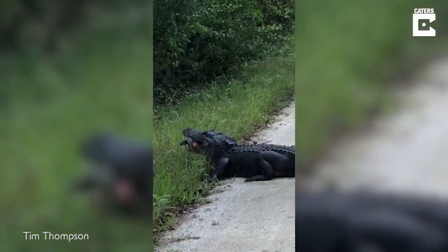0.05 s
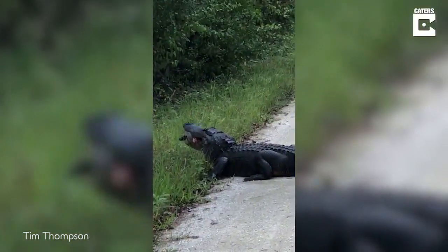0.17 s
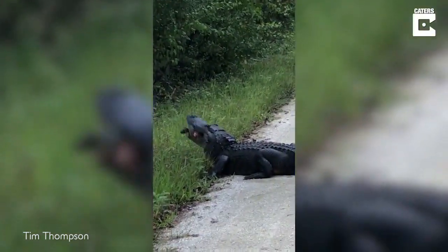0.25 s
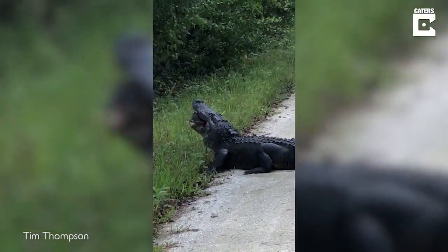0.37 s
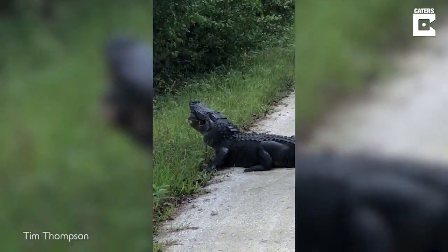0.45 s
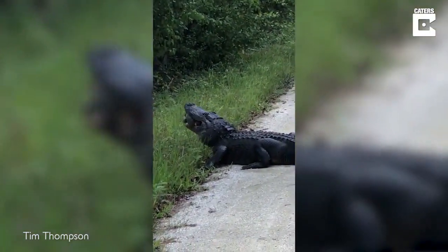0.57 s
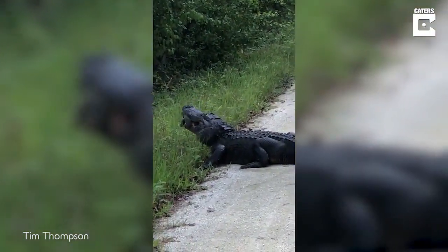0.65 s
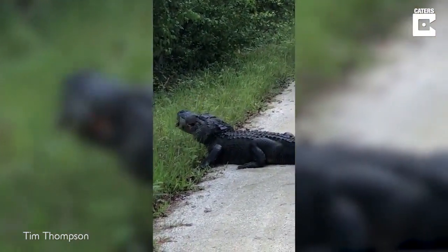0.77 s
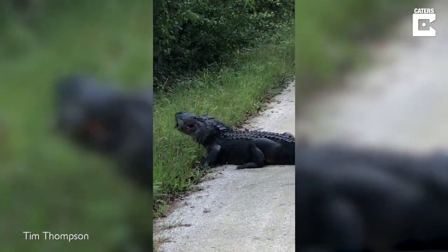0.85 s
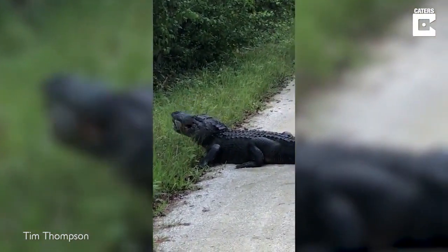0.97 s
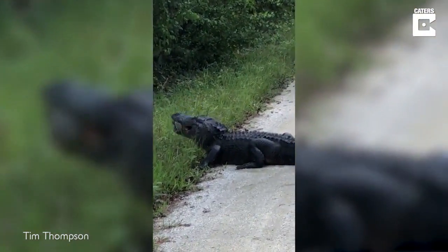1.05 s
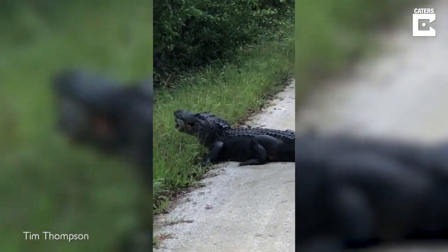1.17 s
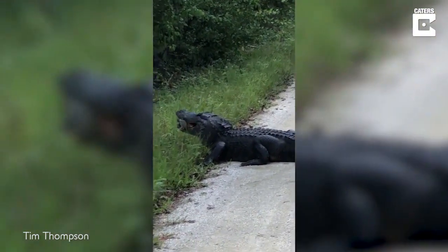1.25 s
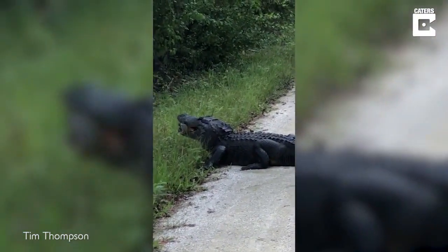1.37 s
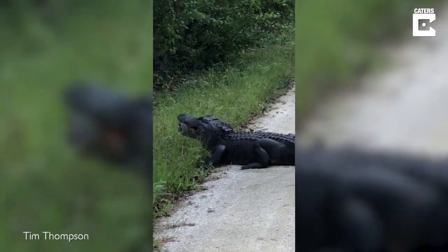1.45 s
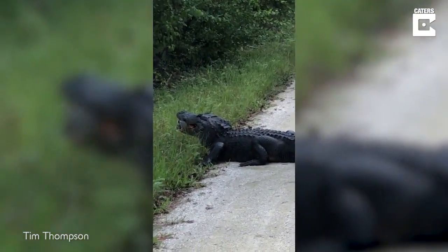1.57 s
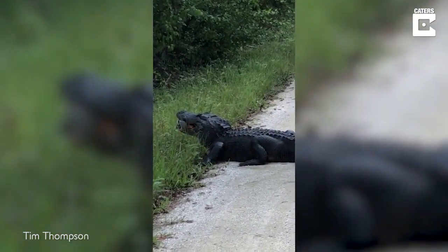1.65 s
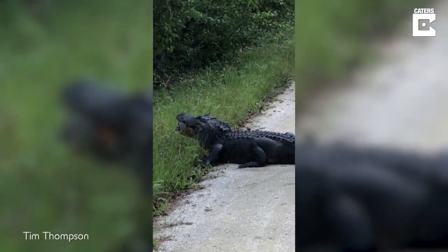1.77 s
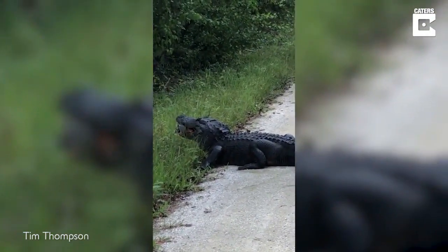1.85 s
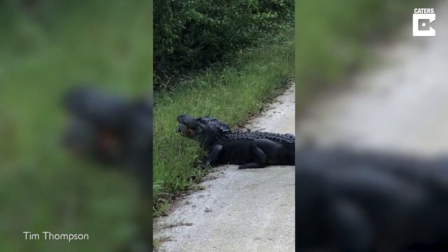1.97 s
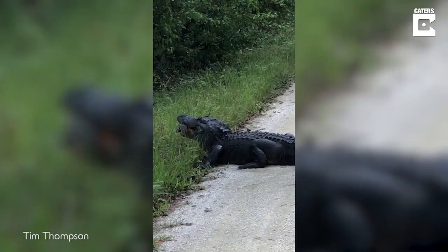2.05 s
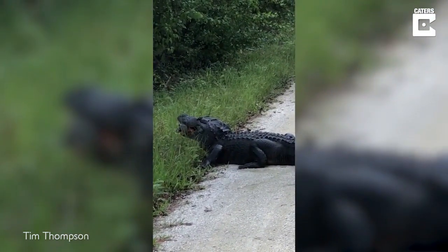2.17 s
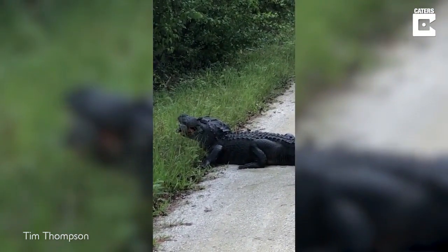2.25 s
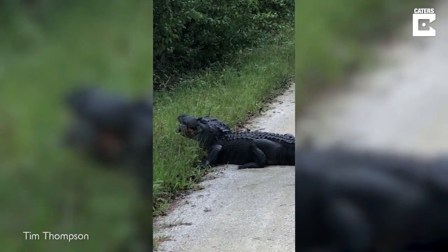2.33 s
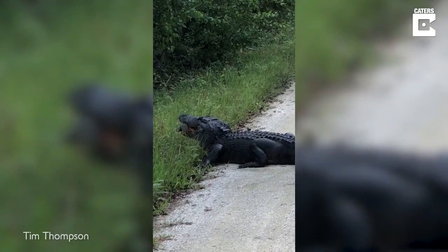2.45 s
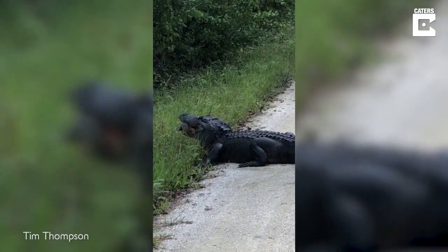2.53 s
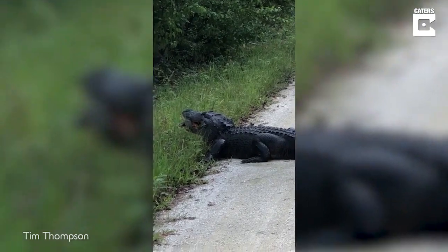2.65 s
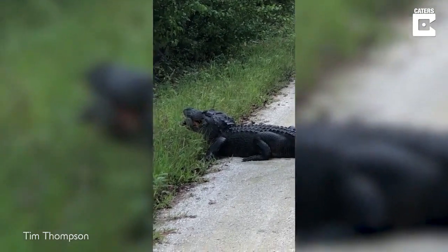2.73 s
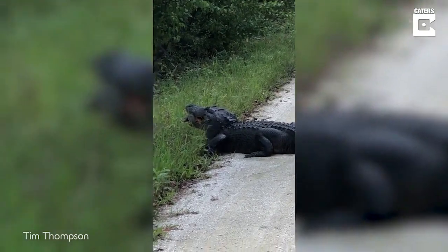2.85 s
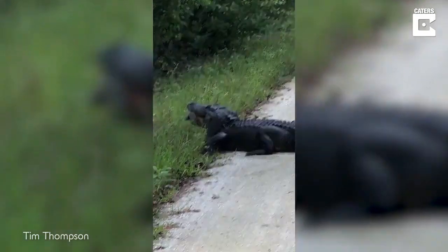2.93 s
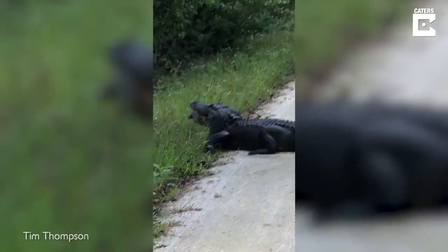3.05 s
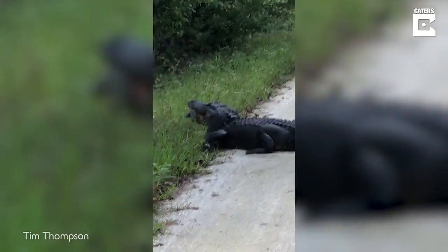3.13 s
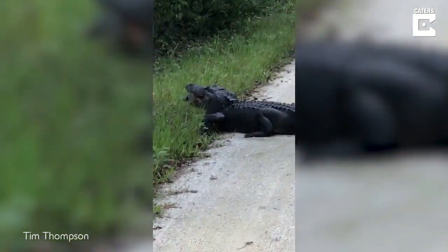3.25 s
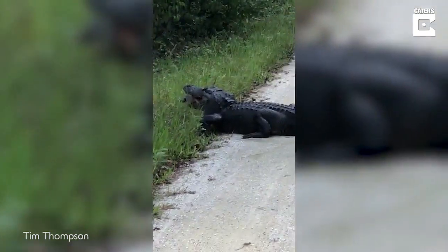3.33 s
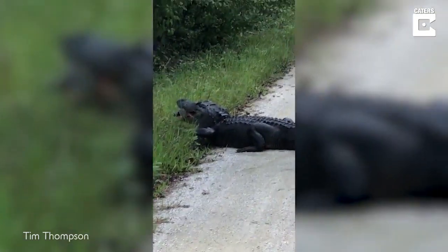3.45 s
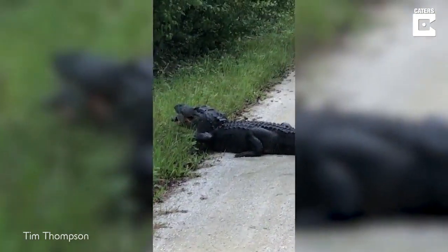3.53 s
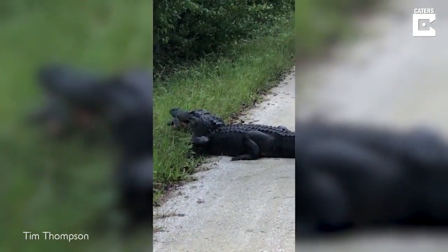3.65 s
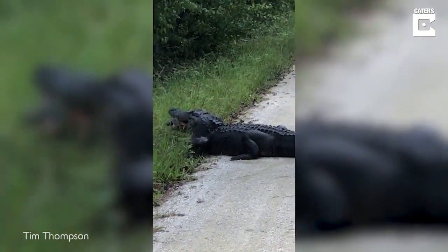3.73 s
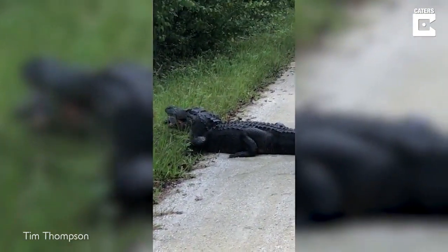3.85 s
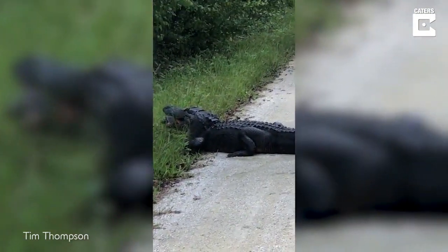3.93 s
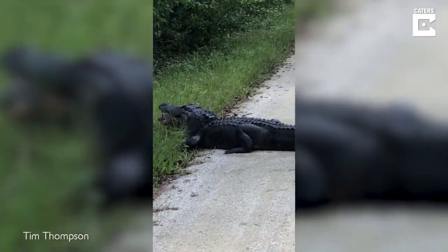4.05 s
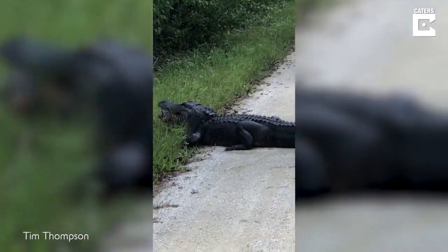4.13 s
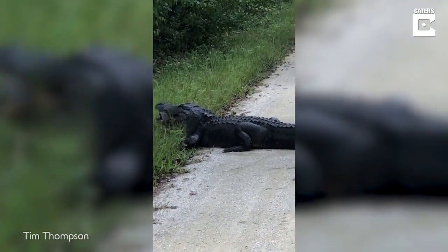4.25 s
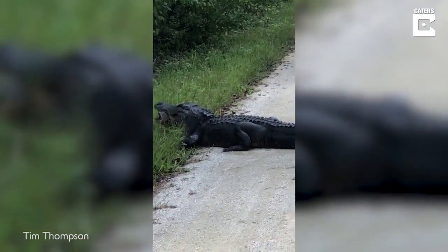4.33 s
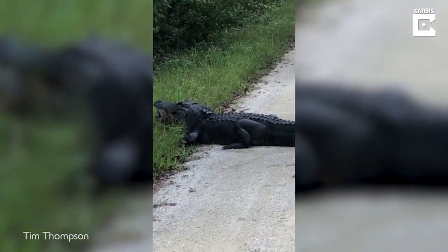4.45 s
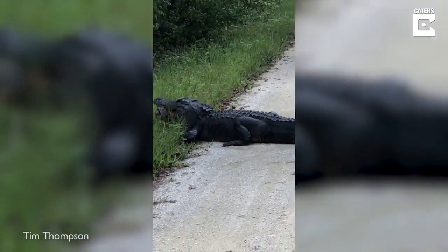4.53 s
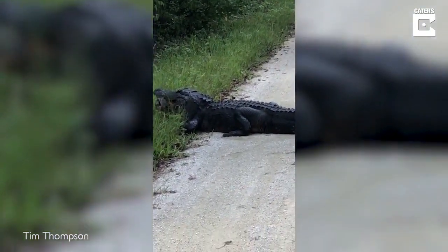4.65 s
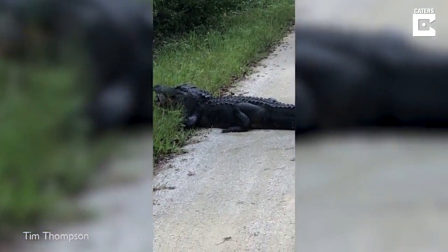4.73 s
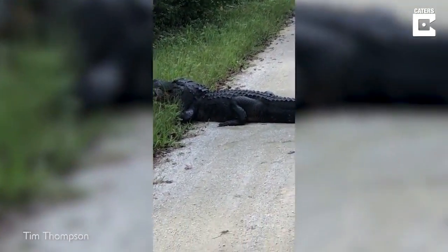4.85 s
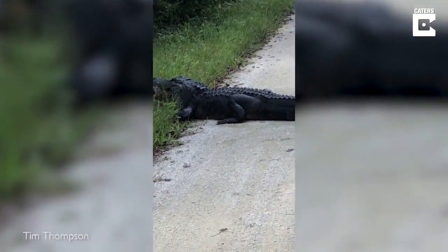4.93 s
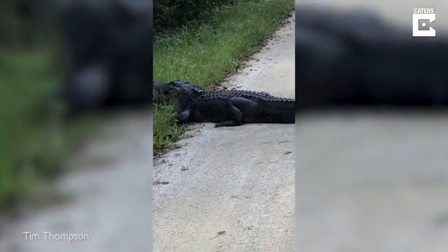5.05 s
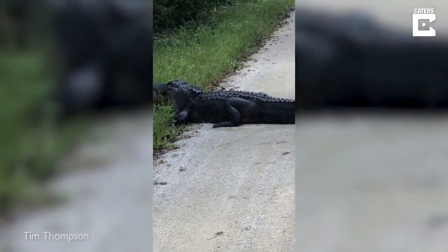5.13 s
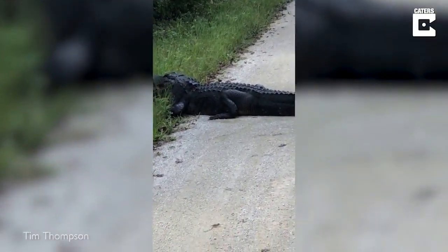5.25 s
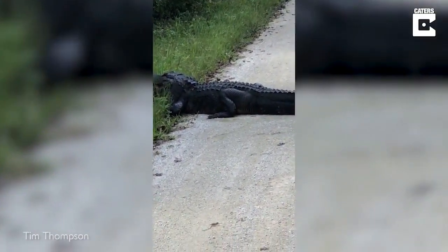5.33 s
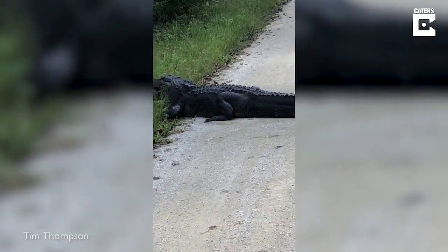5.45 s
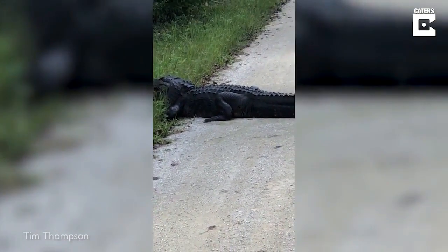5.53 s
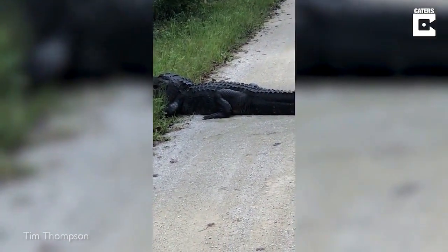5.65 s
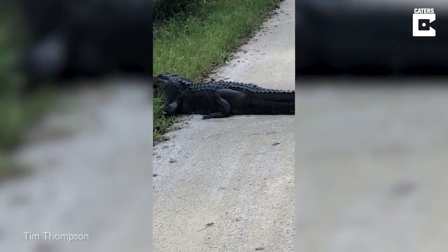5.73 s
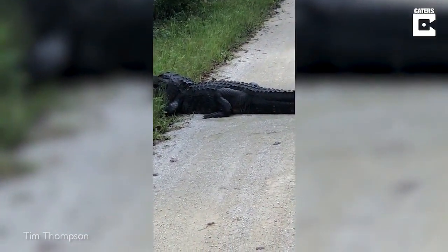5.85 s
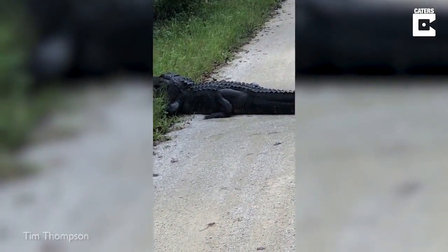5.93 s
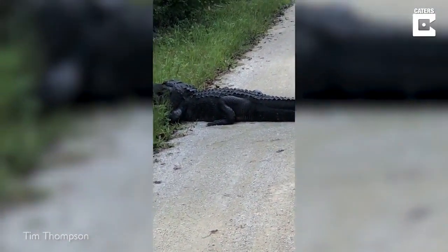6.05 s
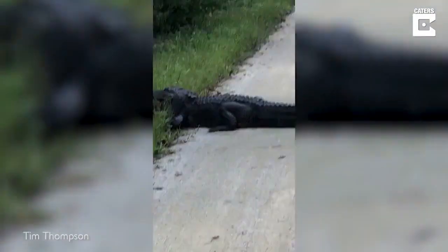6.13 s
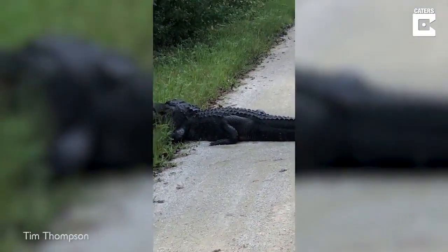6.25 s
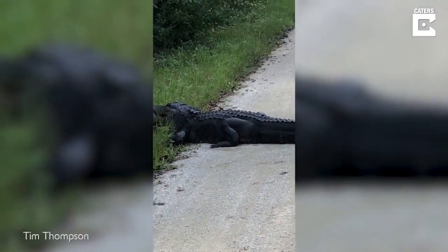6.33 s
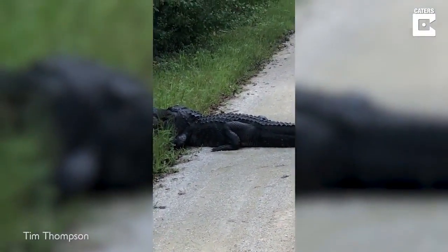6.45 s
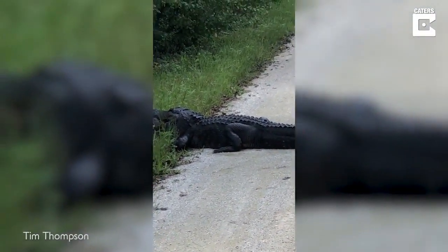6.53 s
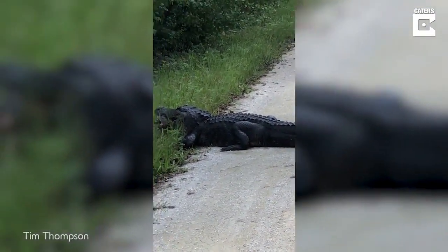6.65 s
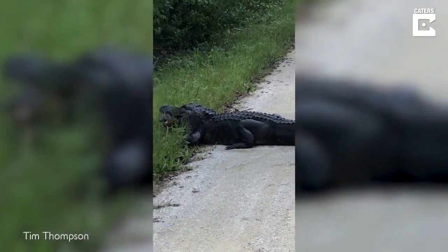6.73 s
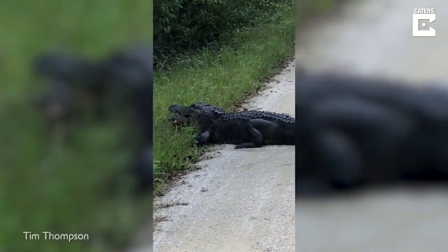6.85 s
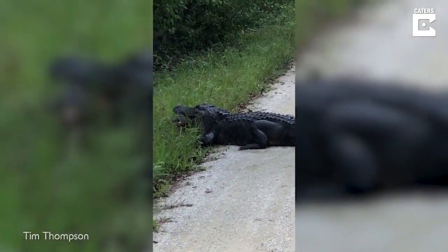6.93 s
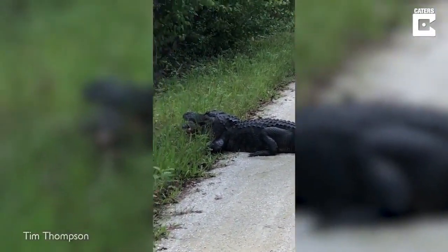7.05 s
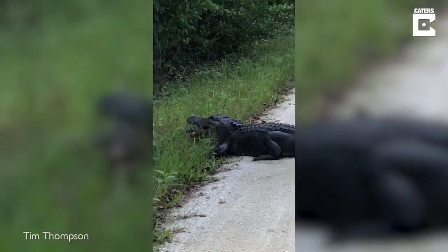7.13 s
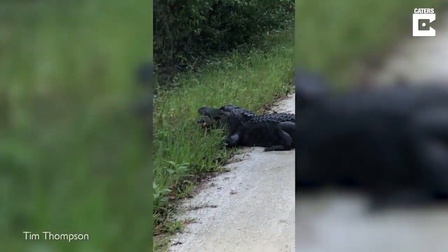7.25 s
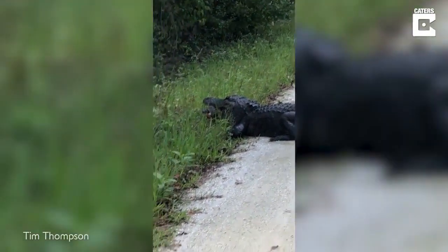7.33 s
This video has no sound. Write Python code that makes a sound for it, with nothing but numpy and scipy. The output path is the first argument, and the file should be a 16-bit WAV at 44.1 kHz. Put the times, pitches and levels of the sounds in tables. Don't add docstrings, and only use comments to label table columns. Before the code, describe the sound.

A hard shell splits and snaps in powerful jaws, ending in a hollow crush that echoes briefly, while an engine idles steadily nearby.

```python
import sys
import numpy as np
from scipy import signal
from scipy.fft import rfft, irfft, next_fast_len
from scipy.io import wavfile

SR = 44100
rng = np.random.default_rng(int(sys.argv[2]) if len(sys.argv) > 2 else 0)


def inscribe(sig):
    pcm = np.round(np.clip(np.atleast_2d(sig).T, -1, 1) * 32767)
    wavfile.write(sys.argv[1], SR, pcm.astype(np.int16))


def nominal_scale(level):
    x = np.asarray(level, float) / 20
    return 10 ** x


N = 325899


def rms_one(x):
    return x / np.sqrt(np.mean(x ** 2) + 1e-20)


def at_hz(points, hz):
    table_hz, values = np.array(points).T
    return np.interp(np.log(hz), np.log(table_hz), values)


def colour(x, spectrum):
    size = next_fast_len(len(x))
    hz = np.arange(size // 2 + 1) * SR / size + 1
    shaped = irfft(rfft(x, size) * nominal_scale(at_hz(spectrum, hz)), size)
    return rms_one(shaped[:len(x)])


def drift(rate_hz):
    r = np.exp(-80 * np.pi * rate_hz / SR)
    noise = rng.standard_normal(N // 40 + 2002)
    slow = signal.lfilter([1], [1, -2 * r, r * r], noise)[2000:]
    return np.interp(np.arange(N) / 40, np.arange(len(slow)), rms_one(slow))


def ring(x, hz, t60_s):
    r = nominal_scale(-60 / (t60_s * SR))
    w = 2 * np.pi * hz / SR
    return signal.lfilter([0, np.sin(w)], [1, -2 * r * np.cos(w), r * r], x + 1e-18)


def butter(x, hz, kind):
    return signal.lfilter(*signal.butter(2, hz, kind, fs=SR), x)


def grains(per_s, spread_db):
    sizes = nominal_scale(spread_db * np.minimum(rng.exponential(1, N), 4)) * rng.choice([-1, 1], N)
    return sizes * (rng.random(N) < per_s / SR)


def stroke(start_s, hold_s, db, attack_s, release_db_per_s):
    t = np.arange(N) / SR - start_s
    rise = np.clip(1 + t / attack_s, 0, 1) ** 2
    return rise * nominal_scale(db - release_db_per_s * np.clip(t - hold_s, 0, 1))


def bump(s, half_s):
    return np.exp(-((np.arange(N) / SR - s) / half_s) ** 2)


# time in seconds, peak in dB, ring in Hz, fracture length in ms.
SPLITS = [(0.5227, -50, 3480, .5), (.5448, -60, 6960, 0.37), (.5542, -75, 5530, .8),
          (.6000, -53, 6160, 1.1), (0.688, -47.5, 6600, 2.9), (.7795, -52, 3400, 1.4),
          (0.839, -26, 5800, 1.2), (0.8494, -30, 3800, 1.1), (0.8565, -9, 3550, 0.47),
          (.8580, -22.5, 1490, 1.5), (0.866, -30, 2440, 2.8), (0.8744, -14.5, 3380, 2.2),
          (0.8776, -53, 2040, 6.8), (0.8875, -41, 3300, 1.6), (0.8975, -28, 6740, 0.66),
          (.9010, -29, 2290, 1.3), (0.9786, -27, 1660, 1.1), (1.1457, -41, 3220, 5.2)]
# time in seconds, peak in dB, ring in Hz, length in ms, body in dB.
BREAKS = [(.5780, -33.5, 3770, 0.98, -10), (.5868, -43, 3400, 2, -8), (0.5894, -44, 3450, 1.5, 1.5),
          (.7973, -27, 3350, 2.5, -19), (0.806, -35, 2840, 2.7, -5.5), (0.8172, -29, 3400, 2.5, -17),
          (0.823, -34, 3500, 0.55, -18), (.9155, -32, 2200, 0.86, -11), (0.9616, -20, 3240, 1.18, -12),
          (.9638, -17.5, 6400, 2.75, -0.5), (1.012, -34, 1600, 1.7, -4.5)]
PLATE_TO_BODY_DB = -24.5
ECHO_DB, ECHO_DB_PER_DECADE, ECHO_FULL_MS = -3, 15.5, 1.74
CAVE_IN_S, CAVE_IN_ECHO_DB = (.955, 0.99), 7


def fractures():
    rows = []
    for s, db, hz, ms, body_db in sorted([(*row, PLATE_TO_BODY_DB) for row in SPLITS] + BREAKS):
        echo_db = db + ECHO_DB + ECHO_DB_PER_DECADE * np.log10(min(ms, ECHO_FULL_MS))
        if CAVE_IN_S[0] < s < CAVE_IN_S[1]:
            echo_db += CAVE_IN_ECHO_DB
        rows.append((s, db, hz, ms, body_db, echo_db))
    return rows


# frequency in Hz, level in dB, t60 in seconds.
BODY_MODES = [(633, 5.5, 0.046), (580, 1, 0.014), (661, -20.5, 0.63), (887, -5.5, 0.062), (1100, -8, 0.046),
              (1330, -11, 0.036), (338, 1.5, 0.018), (1580, -9, 0.22), (1870, -22, .1), (2560, -17, .08)]


def shell():
    out, t = np.zeros(N), np.arange(16384) / SR
    rows = fractures()
    draws = rng.standard_normal((len(rows), 256 + len(BODY_MODES)))
    for (s, db, hz, ms, body_db, _), draw in zip(rows, draws):
        rise = np.clip(t / 0.000099, 0, 1)
        running = rise * np.exp(-np.clip(t - ms / 1000, 0, 1) / 0.00038 - t / 0.0023)
        fracture = np.resize(draw[:256], len(t)) * running
        fracture[6] += 4.0

        plate = ring(ring(fracture, hz, 12.5 / hz), hz, 2.0 / hz)
        snap = butter(fracture, [2200, 7500], "band")
        snap_gain = nominal_scale(-4.0 - 1.9 * ms + hz / 1000)
        crack = plate / np.abs(plate).max() + snap_gain * snap / np.abs(snap).max()
        crack = butter(crack, hz / 5.6, "high")

        push = np.exp(-((t - .0015 - ms / 2000) / 0.00025) ** 2)
        body = 0
        for (mode_hz, mode_db, t60_s), chance in zip(BODY_MODES, draw[256:]):
            body = body + ring(push, mode_hz, t60_s) * nominal_scale(mode_db + 1.4 * chance)
        body = np.diff(body, prepend=0)

        both = crack / np.abs(crack).max() + nominal_scale(body_db) * body / np.abs(body).max()
        at = round(s * SR)
        out[at:at + len(t)] += nominal_scale(db) * both
    return butter(out, 250, "high")


# start in seconds, hold in seconds, level in dB.
GRINDS = [
    (0.513, 0.25, -66.5),
    (0.79, .05, -66),
    (0.874, .003, -43.5),
    (0.967, 0.0028, -42),
]
GRIND_ATTACK_S, GRIND_RELEASE_DB_PER_S = 0.02, 172


def grind():
    clicks = grains(2500, 4.8)
    dealt = rng.integers(0, 10, N)
    rings = 0
    for k, hz in enumerate(np.geomspace(1300, 7000, 10)):
        rings = rings + ring(clicks * (dealt == k), hz, 3.1 / hz)
    return rms_one(rings) * sum(stroke(*row, GRIND_ATTACK_S, GRIND_RELEASE_DB_PER_S) for row in GRINDS)


# frequency in Hz, level in dB, t60 in seconds.
TREES = [(305, -27, 0.33), (620, -7.5, 0.81), (1480, -9.5, 0.65), (2460, -10.5, 0.54), (3600, -11.5, 0.42),
         (5000, -12, 0.58), (9000, -14.5, 0.38), (14800, -21.5, 0.28)]


def trees(level_db):
    span = 2 * SR
    energy, hollow = np.zeros(span), np.zeros(span)
    for s, *_, body_db, echo_db in fractures():
        energy[round(s * SR)] = nominal_scale(2 * echo_db)
        hollow[round(s * SR)] = nominal_scale(2 * echo_db + 1.9 * body_db)

    t, white = np.arange(SR) / SR, rng.standard_normal((2, span))
    levels, decays = np.array(TREES)[:, :2], np.array(TREES)[:, ::2]
    edges = 200 * 2 ** np.arange(0, 6.5, 1 / 3)
    out = 0
    for k, (low, high) in enumerate(zip(edges, edges[1:])):
        hz = np.sqrt(low * high)
        build = (1 - np.exp(-t / 0.0013)) * (1 + 11.6 * np.exp(-t / 0.0036))
        dying = nominal_scale(-120 * t / at_hz(decays, hz)) * build
        sos = signal.butter(2, [low, high], "band", fs=SR, output="sos")
        band = signal.sosfilt(sos, white[k % 2])
        power = signal.fftconvolve(hollow if hz < 1200 else energy, dying)[:span]
        out = out + nominal_scale(at_hz(levels, hz)) * band * np.sqrt(np.abs(power))
    return nominal_scale(level_db) * np.pad(out, (0, N - span))


# start in seconds, hold in seconds, level in dB, fine over coarse blades in dB.
DRAGS = [
    (2.853, 0.64, -86.5, 1),
    (3.93, .35, -85, -4),
    (3.15, 0.046, -84, -15),
    (3.508, 0.076, -68.5, -5),
    (3.633, .02, -67, -7),
    (3.685, 0.024, -77, 3),
    (3.77, 0.023, -79, 8),
    (3.83, 0.039, -73, -1.5),
    (4.022, .09, -70.5, -8),
    (4.145, .04, -69, -12),
]
DRAG_ATTACK_S, DRAG_RELEASE_DB_PER_S = 0.039, 250
# frequency in Hz, level in dB per Hz.
LOW_BLADES = [(2000, -4), (4000, -6), (6500, -5.5), (8500, -15), (12000, -34)]
HIGH_BLADES = [(5000, -28), (8000, 1), (11000, 1), (14000, -4), (16000, -18)]
# time in seconds, peak in dB, centre in Hz.
STEMS = [(0.1073, -60, 9000), (3.7627, -52, 9000), (4.0327, -63, 6400), (4.1445, -58, 6800),
         (4.162, -49.5, 9000), (4.9836, -60, 9000), (5.7294, -74, 9000), (6.6598, -55, 9000)]


def grass():
    coarse, fine = 0, 0
    for s, hold_s, db, fine_db in DRAGS:
        gain = stroke(s, hold_s, db, DRAG_ATTACK_S, DRAG_RELEASE_DB_PER_S)
        coarse = coarse + gain
        fine = fine + nominal_scale(fine_db) * gain
    brush = colour(grains(3000, 2.6) * nominal_scale(2.0 * drift(25)), LOW_BLADES) * coarse
    brush += colour(grains(5000, 2.2) * nominal_scale(2.0 * drift(25)), HIGH_BLADES) * fine
    for s, db, hz in STEMS:
        burst = rng.standard_normal(400) * np.exp(-np.arange(400) / (0.0023 * SR))
        snap = butter(burst, [hz / 1.6, hz * 1.44], "band")
        at = round(s * SR)
        brush[at:at + 400] += nominal_scale(db) * snap / np.abs(snap).max()
    return brush


def gulp():
    start_s, peak_db, from_hz, to_hz, fade_s_per_20_db = 7.3148, -49, 1300, 450, .015
    t = np.clip(np.arange(N) / SR - start_s, 0, 1)
    pitch_hz = (t > 0) * (to_hz + (from_hz - to_hz) * np.exp(-t / .003))
    return nominal_scale(peak_db - 20 * t / fade_s_per_20_db) * np.sin(2 * np.pi * np.cumsum(pitch_hz) / SR)


# time in seconds, cycles per second.
SPEED = [(0.0, 15.499), (0.49, 15.69), (0.99, 15.675), (1.48, 15.736), (1.97, 15.783), (2.46, 15.708),
         (2.96, 15.623), (3.45, 15.97), (3.94, 15.832), (4.43, 15.461), (4.93, 15.826), (5.42, 15.512),
         (5.91, 15.727), (6.4, 15.734), (6.9, 15.575), (7.39, 16.01)]


def engine_cycle():
    s, cycles_per_s = np.transpose(SPEED)
    return np.cumsum(np.interp(np.arange(N) / SR, s, cycles_per_s)) / SR


# time in seconds, loss in dB.
STUMBLES = [
    (.95, 4),
    (1.34, 2),
    (6.625, 4),
    (7.38, 12),
]


def idle_db():
    throb_db, wander_db, wanders_per_s, stumble_s = -54, 1.0, 2.3, .07
    loss_db = sum(db * bump(s, stumble_s) for s, db in STUMBLES)
    return throb_db + wander_db * drift(wanders_per_s) - loss_db


# multiple of the engine cycle, level in dB.
EXHAUST = [(2, -16.5), (3, -19), (4, -20), (5, 1.5), (6, -0.5), (7, -9.5), (8, -12), (9, -22.5), (10, -20),
           (14, -37)]


def exhaust(cycle, throb_db):
    pulse_at_cycles, pulse_shape_turns = .22, .35
    muffler_order, muffler_width = 5.5, .7
    lines = 0
    for k, db in EXHAUST:
        lag = np.arctan((k - muffler_order) / muffler_width)
        turns = k * (cycle - pulse_at_cycles) + pulse_shape_turns
        lines = lines + nominal_scale(db) * np.cos(2 * np.pi * turns - lag)
    return nominal_scale(throb_db) * rms_one(lines)


# time in seconds, peak in dB, half-length in seconds.
FAN_SWELLS = [(.03, -68, .15), (0.616, -65.5, .15), (1.54, -64, 0.076), (1.867, -64, .15),
              (2.23, -62.5, 0.073), (2.824, -60.5, 0.22), (3.194, -63.5, 0.17), (3.615, -54, .4),
              (4.647, -59.5, 0.17), (4.873, -63.5, 0.11), (5.32, -59, 0.25), (5.9, -71, 0.062),
              (6.332, -60.5, 0.38)]


def fan():
    swells = sum(nominal_scale(db) * bump(s, half_s) for s, db, half_s in FAN_SWELLS)
    pitch_hz = 119.8 + 0.41 * drift(0.65)
    return np.sqrt(2) * swells * np.sin(2 * np.pi * np.cumsum(pitch_hz) / SR)


# frequency in Hz, width in Hz, level in dB, belt throb 0-1, valve throb 0-1.
WHIRRS = [(308, 12.6, -73.5, 0, 0.9), (357.8, 5, -74, 0.06, 0.36), (468.5, 20, -75.5, 0, 0.3),
          (662, 10.3, -76, 1, 0.2), (960.4, 37, -78.5, .1, 0), (1149, 32, -74.5, 0.74, 0),
          (1243.4, 14, -74.5, 0.96, 0.13), (1772, 186, -71, 0.25, 0.48)]
# frequency in Hz, level in dB per Hz.
FLOOR = [(150, -2.5), (340, -5), (395, -10.5), (480, -4), (720, -6.5), (1060, -13), (2100, -18),
         (3100, -17.5), (3550, -18), (3950, -24), (4500, -19.5), (5400, -22.5), (9000, -34), (15500, -38)]
FLOOR_DB = -58


def engine_bay(cycle):
    belt = np.cos(2 * np.pi * (cycle / 3 - .07))
    valves = 0.17 * np.cos(2 * np.pi * (cycle - .3)) + 0.67 * np.cos(2 * np.pi * (2 * cycle - .25))
    air = colour(rng.standard_normal(N), [(20, -4.0), (60, -4.5), (100, 7.0)] + FLOOR)
    out = nominal_scale(FLOOR_DB - 0.5 + 0.67 * drift(26)) * np.sqrt(1 + 0.21 * valves) * air
    for hz, width_hz, db, by_belt, by_valves in WHIRRS:
        narrow = ring(ring(rng.standard_normal(N), hz, 2.2 / width_hz), hz, 1.1 / width_hz)
        power = np.clip((1 + by_belt * belt) * (1 + by_valves * valves), 0, 9)
        out += nominal_scale(db) * rms_one(narrow) * np.sqrt(power)
    return out


def scene():
    animal = shell() + grind() + trees(level_db=-11.5) + grass() + gulp()
    cycle = engine_cycle()
    engine = exhaust(cycle, idle_db()) + fan() + engine_bay(cycle)
    return (animal + engine)[None]


def top_cut(x):
    return signal.sosfilt(signal.butter(12, 15780, fs=SR, output="sos"), x)


def record(dry):
    return top_cut(dry)


dry = scene()
out = record(dry)
inscribe(out)
```